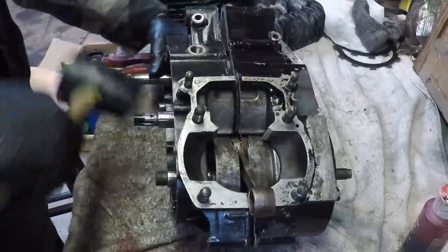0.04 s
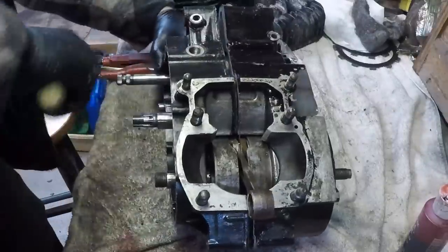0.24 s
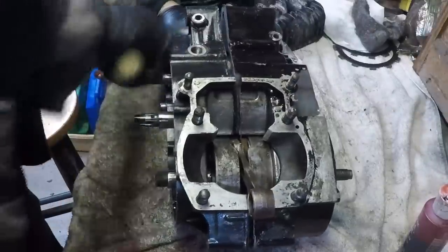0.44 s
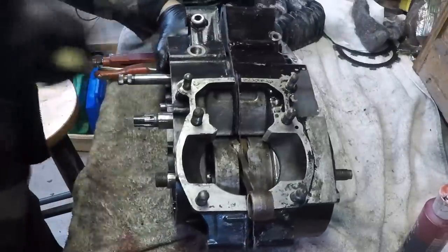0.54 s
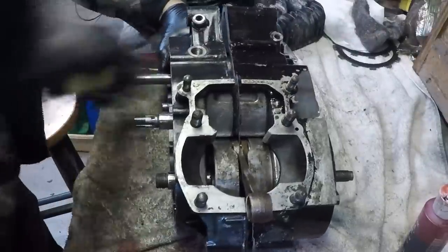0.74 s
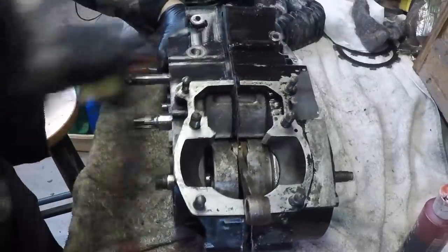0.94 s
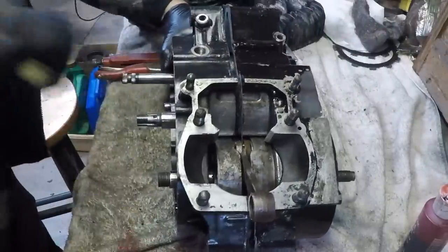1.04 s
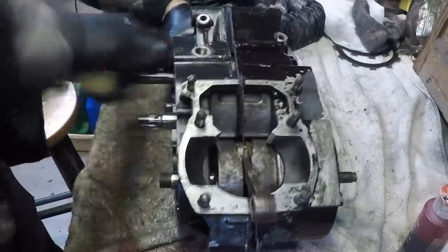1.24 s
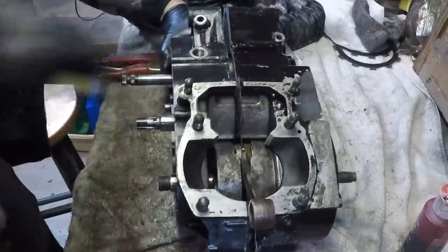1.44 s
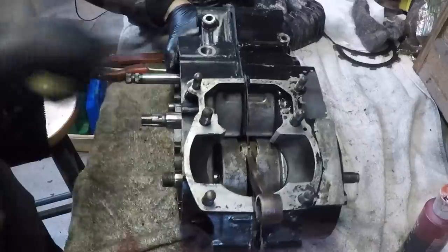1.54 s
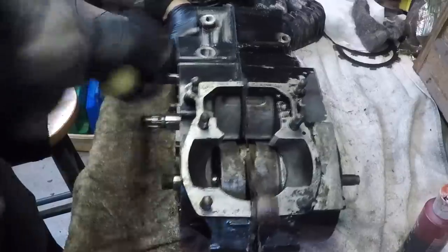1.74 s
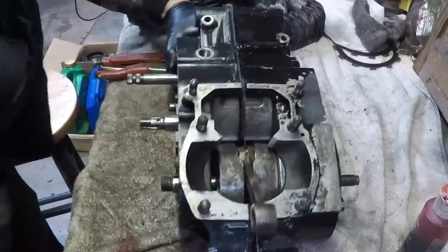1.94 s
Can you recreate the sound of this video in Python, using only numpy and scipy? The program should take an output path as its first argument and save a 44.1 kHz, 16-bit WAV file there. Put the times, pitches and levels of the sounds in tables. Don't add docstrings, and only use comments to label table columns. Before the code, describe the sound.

A mallet strikes a metal engine casing six times at a steady quick pace, after a short stretch of hiss and low rumble; each blow is a dull, overloaded thump with a small metallic clack, close microphone, indoor workshop.

```python
import sys
import numpy as np
from scipy import signal
from scipy.fft import rfft, irfft
from scipy.io import wavfile
from scipy.ndimage import uniform_filter1d

SR = 44100
rng = np.random.default_rng(int(sys.argv[2]) if len(sys.argv) > 2 else 0)


def int16_out(signal):
    q = np.round(np.clip(np.atleast_2d(signal).T, -1, 1) * 32767)
    wavfile.write(sys.argv[1], SR, q.astype(np.int16))


def voltage_ratio(level):
    return 10 ** (np.asarray(level, float) / 20)


N = 88200
RISE_S = 0.002


def evened(x):
    return x / np.sqrt(np.mean(x ** 2) + 1e-20)


def read(points, hz):
    f, value = np.transpose(points)
    return np.interp(np.log(hz + 1), np.log(f + 1), value)


def add(mix, s, sound):
    part = mix[round(s * SR):][:len(sound)]
    part += sound[:len(part)]


def coloured(x, points):
    gain = voltage_ratio(read(points, np.fft.rfftfreq(len(x), 1 / SR)))
    return irfft(rfft(x) * gain, len(x))


def ring(t, hz, db, t60, rise):
    t = np.maximum(t, 0)
    decay = voltage_ratio(db - 60 * t / t60)
    return decay * (1 - np.exp(-t / rise)) * np.sin(2 * np.pi * hz * t)


def burst(t, hz, width_hz, t60):
    f = np.fft.rfftfreq(len(t), 1 / SR)
    spectrum = rfft(rng.standard_normal(len(t))) / (1 + ((f - hz) / width_hz) ** 2)
    noise = evened(irfft(spectrum, len(t)))
    return noise * (t > 0) * voltage_ratio(-60 * np.maximum(t, 0) / t60)


def low_noise(hz, order):
    f = np.fft.rfftfreq(N, 1 / SR)
    shape = (f / (f + 12)) ** 2 / (1 + (f / hz) ** order)
    return evened(irfft(rfft(rng.standard_normal(N)) * shape, N))


def gain_control():
    attack_s = 0.05
    t = np.arange(N) / SR
    times = [blow_row[0] for blow_row in MALLET_BLOWS]
    first = np.maximum(t - times[0], 0)
    last = np.array([0] + times)[np.searchsorted(times, t)]
    return 1 - np.exp(-first / attack_s), (t - last) * (first > 0)


# f/Hz, level/dB (per Hz)
HISS_SPECTRUM = [(30, -9), (70, 0.5), (257, -5), (749, -6.5), (2510, -16), (8630, -20.5), (14600, -25),
                 (16000, -35)]
# t/s, level/dB
MOUNT_SWAY = [
    (0.0, -33),
    (0.1, -27),
    (0.2, -24),
    (0.34, -26),
    (0.39, -29),
]


def background():
    duck_db, duck_treble_db, drift_db_per_s = -9.5, -9, -1.5
    share, since = gain_control()
    down = share * duck_db + drift_db_per_s * since
    hiss = voltage_ratio(-49) * evened(coloured(rng.standard_normal(N), HISS_SPECTRUM))
    low = signal.lfilter(*signal.butter(1, 900, fs=SR), hiss)
    treble = hiss - low
    hiss = voltage_ratio(down) * (low + voltage_ratio(share * duck_treble_db) * treble)
    sway_db = np.interp(np.arange(N) / SR, *np.transpose(MOUNT_SWAY))
    sway = voltage_ratio(sway_db) * (1 - share) * low_noise(15, order=5)
    rumble = voltage_ratio(-34 + 0.2 * down) * share * low_noise(30, order=3)
    return hiss + sway + rumble


# t/s, level/dB, f/Hz, t60/s
SETTLING_TICKS = [
    (1.592, -54, 6100, .03),
    (1.640, -40, 470, .04),
    (1.672, -43, 470, .04),
]


def settling_tick(db, hz, t60):
    return ring(np.arange(4000) / SR, hz, db, t60, 0.00127)


# f/Hz, level/dB, t60/s
PART_MODES = [(830, -8, .03), (1200, -5, .025), (1470, 0, .022), (1880, -7, .03), (2480, -5, .025),
              (2815, -1, .07), (3700, -16, .03), (4550, -15, .03), (5940, -14, .045), (7900, -17, .022),
              (10430, -15, .04)]
# t/s, peak level/dB, level below 2200 Hz/dB, level above 9000 Hz/dB
PART_BOUNCES = [(0.4383, -24, -12, -16), (0.7096, -20, 4, -30), (.729, -33, 5.5, -17), (.769, -54, -6, -21),
                (0.9702, -21.5, 2, -19), (0.9942, -38, 5, -10), (1.2366, -21.5, 4, -14),
                (1.2600, -36, 6, -11), (1.272, -44.5, 14.5, -9), (1.332, -58, 6, -4),
                (1.4879, -24, -16, -8), (1.7978, -18.5, 4, -8.5), (1.8056, -35, -6, -3),
                (1.8313, -24, 0, -8), (1.8465, -32.5, -1, -5)]


def bounce(start, db, dull_db, sparkle_db):
    detune, scatter_db, rise_s = 0.004, 1.5, 0.001
    roughness, snap, snap_s = 0.3, 1.6, 0.003
    t = np.arange(SR // 6) / SR
    u = rng.standard_normal((len(PART_MODES), 2))
    rattle = rng.standard_normal((len(PART_MODES), len(t)))
    flutter = 1 + roughness * evened(uniform_filter1d(rattle, size=120, axis=1))
    modes = np.zeros(len(t))
    for (f, level, t60), (a, b), w in zip(PART_MODES, u, flutter):
        level = level + scatter_db * b + dull_db * (f < 2200) + sparkle_db * (f > 9000)
        modes += w * ring(t, f * (1 + detune * a), level, t60, rise_s)
    modes *= 1 + snap * np.exp(-t / snap_s)
    click = voltage_ratio(2) * burst(t, 1600, 3000, 0.03)
    room = voltage_ratio(-12 + dull_db / 2) * burst(t, 1300, 1400, 0.14)
    clack = (click + room) * (1 - np.exp(-t / 0.003))
    return start - 0.001, voltage_ratio(db - 3) * (modes + clack)


# hiss level/dB, thin ring level/dB, knock level/dB, knock f/Hz
JOINT_SHIVER = [
    (-44.5, -64.5, -6, 830),
    (-39, -57.5, -7, 1300),
    (-39.5, -59, -1, 1000),
    (-36, -65, -6, 1280),
    (-30.5, -29.5, -8.5, 1000),
    (-39.5, -50, -1, 1100),
]


def shiver(hiss_db, ring_db, knock_db, knock_hz):
    t = np.arange(SR // 3) / SR
    knock = ring(t, knock_hz, knock_db, 0.059, 0.0013)
    hiss = voltage_ratio(hiss_db) * burst(t, 4600, 3000, 0.22)
    thin_ring = voltage_ratio(ring_db) * burst(t, 7150, 220, 0.17)
    return knock + (hiss + thin_ring) * (1 - np.exp(-t / RISE_S))


# f/Hz, level/dB (per Hz)
CHATTER_SPECTRUM = [(88, -40.5), (150, -4), (1260, -23.5), (1420, -25), (1900, -26.5), (4160, -52),
                    (7320, -52), (13400, -62.5), (16000, -84.5)]
# f/Hz, t60/s
CHATTER_DECAY = [(150, 0.16), (600, 0.19), (2000, .17), (6000, 0.22), (15000, 0.04)]


def chatter(t):
    noise = evened(coloured(rng.standard_normal(len(t)), CHATTER_SPECTRUM))
    hz, at, z = signal.stft(noise, SR, nperseg=256)
    decay = voltage_ratio(-60 * at / read(CHATTER_DECAY, hz)[:, None])
    tail = signal.istft(z * decay, SR, nperseg=256)[1][:len(t)]
    return tail * (1 - np.exp(-t / RISE_S))


# f/Hz, level/dB, t60/s, first trough t/s
BENCH_MODES = [(65, -12, .18, 0.01), (93, 1.5, 0.12, 0.0066), (124.2, -6, 0.15, 0.006),
               (143.8, -4.5, 0.074, .007), (180.8, -0.5, 0.11, .007), (242, -6, .1, .007),
               (288.2, -2, 0.057, .006)]
# f/Hz, level/dB, t60/s, width f/Hz
BENCH_HUM = [(79.5, -27.5, 0.58, 6.5), (150, -32.5, 0.44, 18), (218, -33.5, 0.58, 24)]
# f/Hz, level/dB, t60/s
CASTING_MODES = [(385.8, -10, 0.064), (459.4, -1.5, 0.052), (559.2, -0.5, 0.038), (669, -2.5, 0.042),
                 (860, -3.5, 0.042), (985, -17.5, 0.042), (1134.6, -1, 0.046), (1254.5, -2, 0.027),
                 (1499, -11, 0.04), (1656, -7, 0.027), (1911, -5, 0.029), (2310, -13.5, 0.04),
                 (2508, -9, 0.04), (3210, -14.5, .04)]
# t/s, thump level/dB, casting level/dB, crack level/dB, crack f/Hz
MALLET_BLOWS = [
    (0.3978, 0, 8, -8.5, 7494),
    (0.651, -1.5, 4, -10.5, 6020),
    (0.9196, -2, 6, -9.5, 6040),
    (1.1809, 0.5, 8, -9, 6000),
    (1.4330, -4, 6.5, -4.5, 6890),
    (1.7044, -2.5, 5, -10.5, 5910),
]


def blow(start, thump_db, casting_db, crack_db, crack_hz):
    scatter_db, detune = 1.5, 0.012
    t = np.arange(SR // 2) / SR
    u = rng.standard_normal((len(BENCH_MODES), 2))
    v = rng.standard_normal((len(CASTING_MODES), 3))

    thump = np.zeros(len(t))
    for (f, db, t60, trough_s), (a, b) in zip(BENCH_MODES, u):
        decay = voltage_ratio(db + scatter_db / 2 * b - 60 * t / t60)
        thump -= decay * np.cos(2 * np.pi * f * (1 + detune * a) * (t - trough_s))
    for f, db, t60, width_hz in BENCH_HUM:
        thump += voltage_ratio(db) * burst(t, f, width_hz, t60)
    thump *= 1 - np.exp(-(t / 0.006) ** 2)

    casting = np.zeros(len(t))
    for (f, db, t60), (a, b, c) in zip(CASTING_MODES, v):
        late = t - 0.00078 * abs(c)
        casting += ring(late, f * (1 + detune * a), db + scatter_db * b, t60, RISE_S)

    late = t - 0.00073
    crack = burst(late, crack_hz, 400, 0.015)
    crack += voltage_ratio(-0.5) * burst(late, 2700, 3900, 0.04) * (1 - np.exp(-t / RISE_S))

    sound = voltage_ratio(thump_db) * thump + voltage_ratio(casting_db - 6) * casting + voltage_ratio(crack_db) * crack
    return start, sound + voltage_ratio(crack_db / 2 - 7.5) * chatter(t)


def scene():
    mix = background()
    for row in MALLET_BLOWS:
        add(mix, *blow(*row))
    for row, levels in zip(MALLET_BLOWS, JOINT_SHIVER):
        add(mix, row[0], shiver(*levels))
    for row in PART_BOUNCES:
        add(mix, *bounce(*row))
    for s, *tick in SETTLING_TICKS:
        add(mix, s, settling_tick(*tick))
    return mix[None]


def top_cut(x):
    return signal.sosfilt(signal.butter(12, 16550, fs=SR, output="sos"), x)


def record(dry):
    ceiling, knee, edge_hz = 1.02, 2.9, 15300
    x = ceiling * dry / (1 + abs(dry) ** knee) ** (1 / knee)
    lowpass = signal.firwin(95, edge_hz, window=("kaiser", 5), fs=SR)
    x = signal.oaconvolve(x, lowpass[None], "same")
    return top_cut(x)


dry = scene()
out = record(dry)
int16_out(out)
```